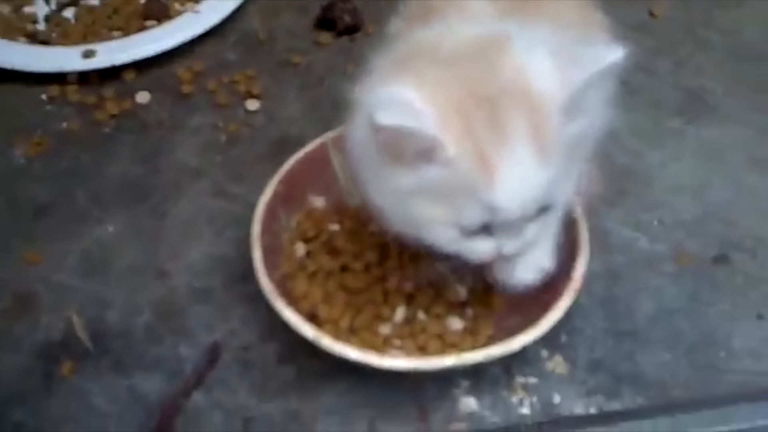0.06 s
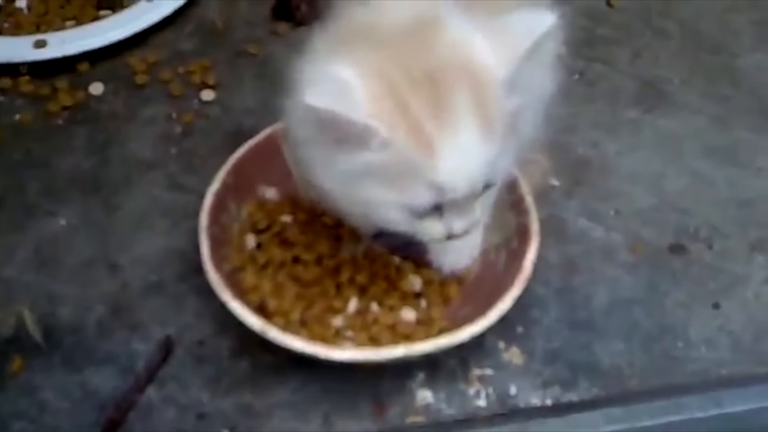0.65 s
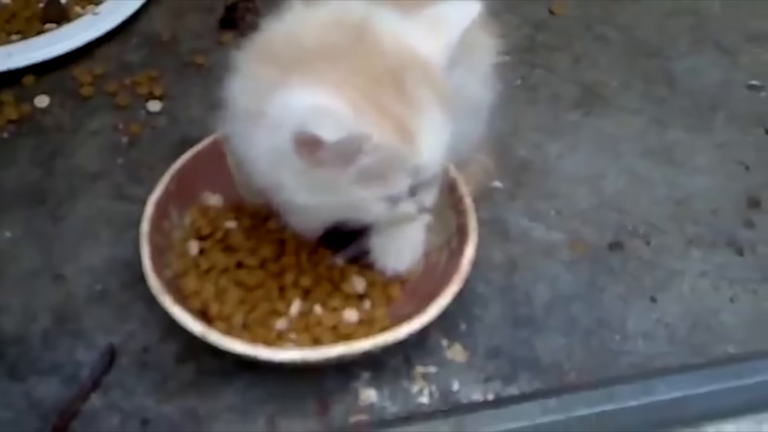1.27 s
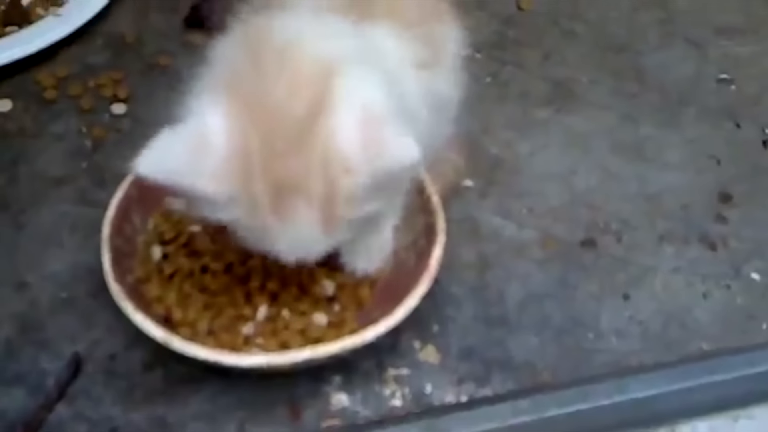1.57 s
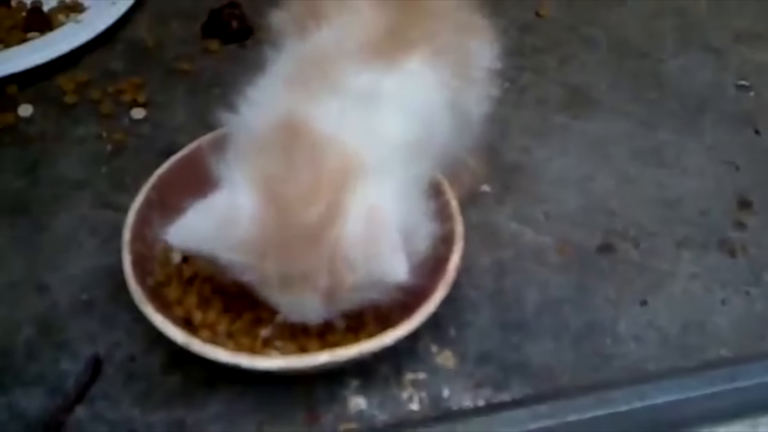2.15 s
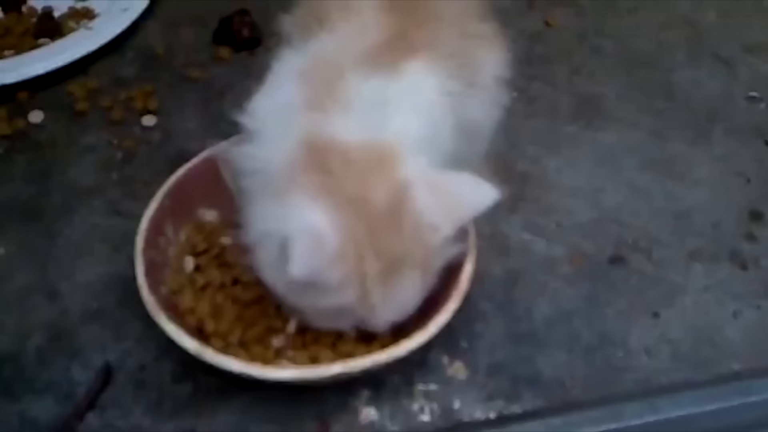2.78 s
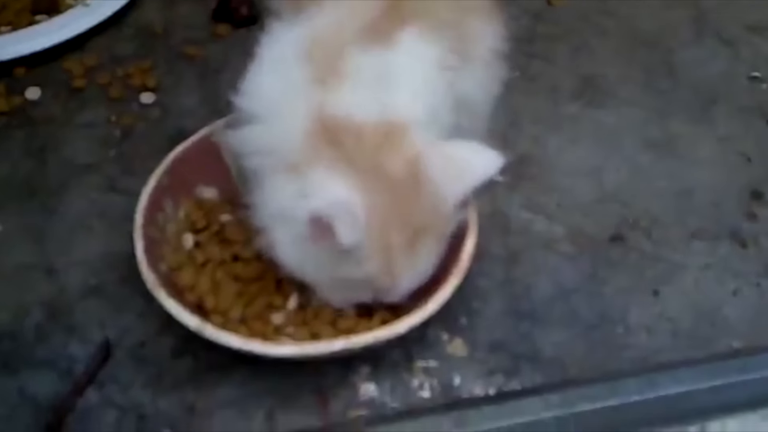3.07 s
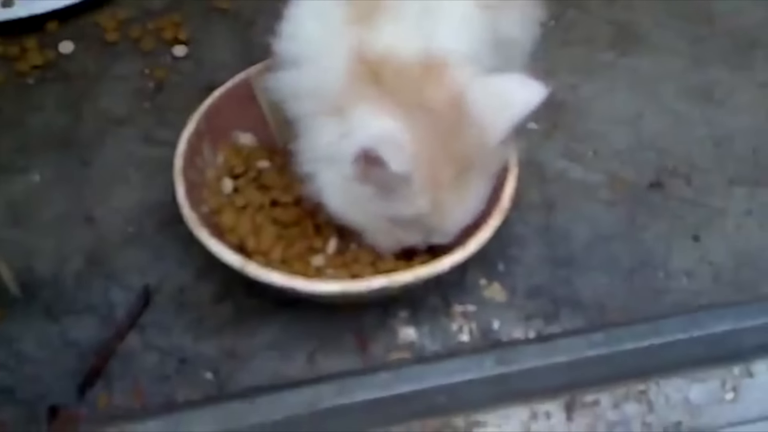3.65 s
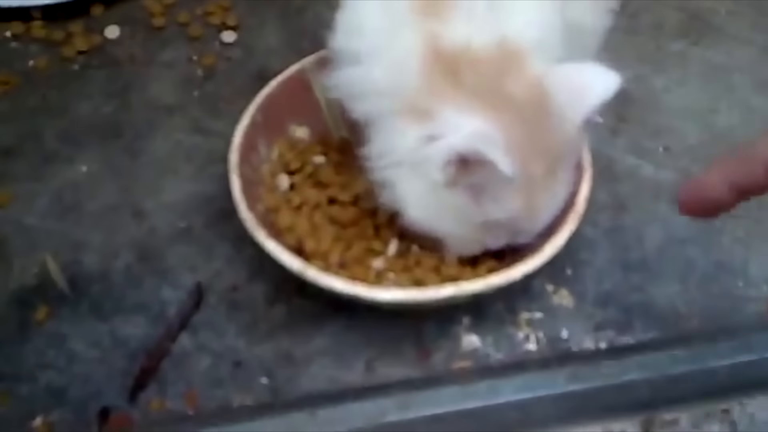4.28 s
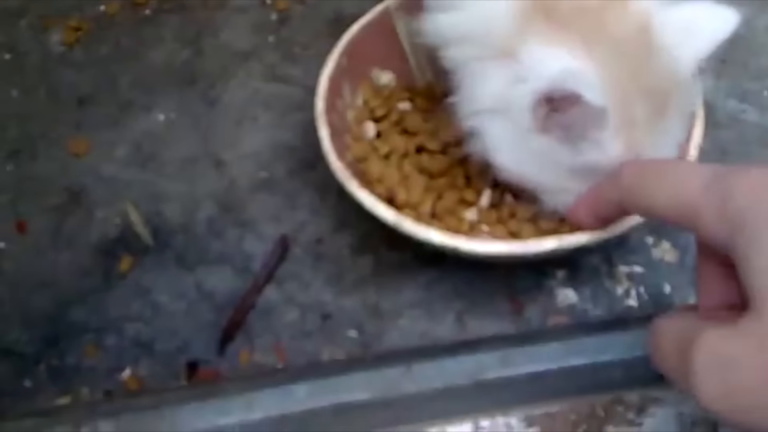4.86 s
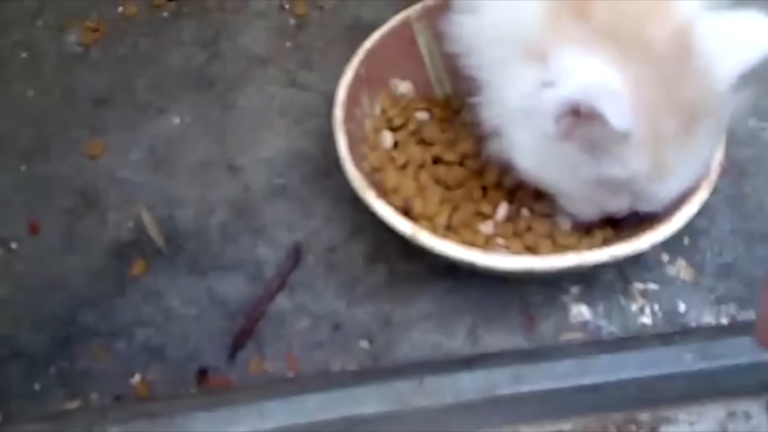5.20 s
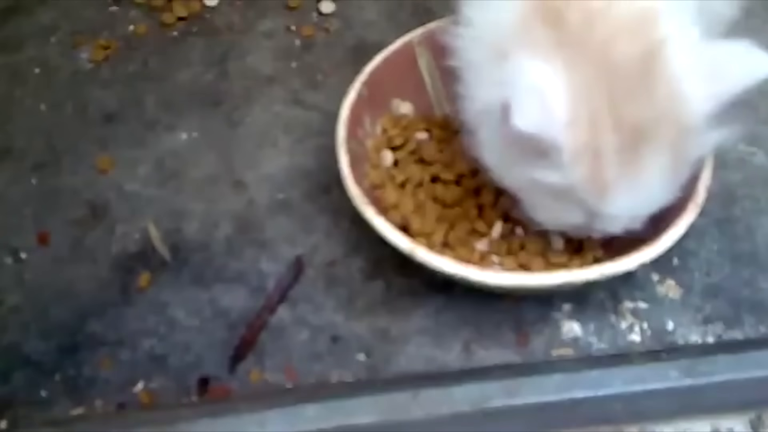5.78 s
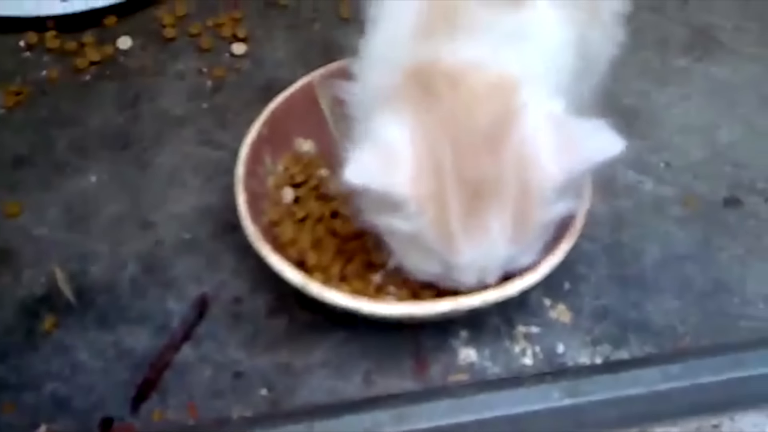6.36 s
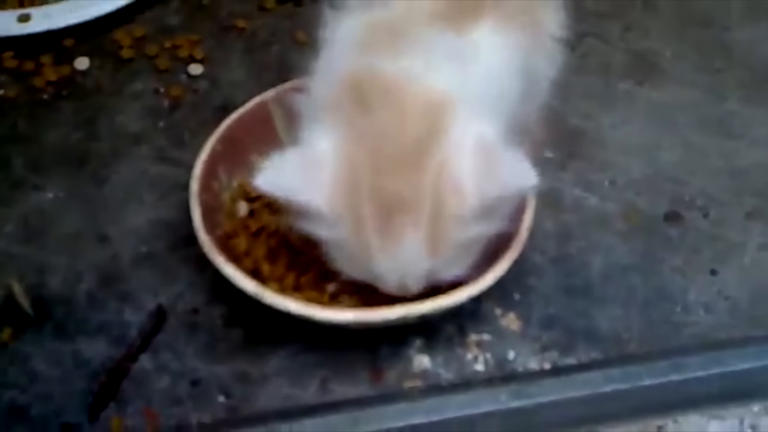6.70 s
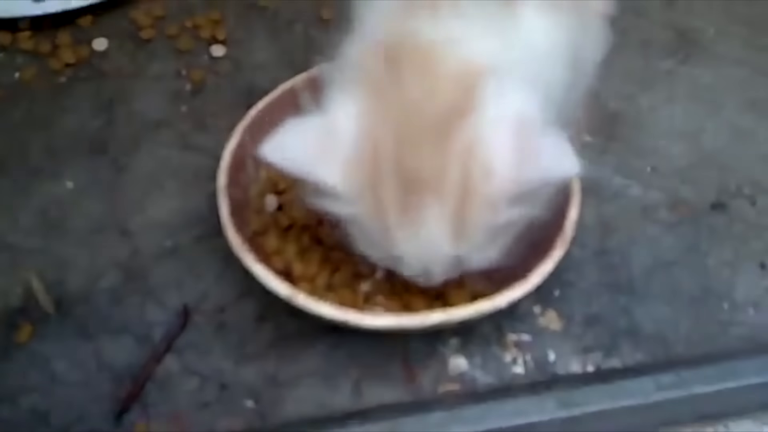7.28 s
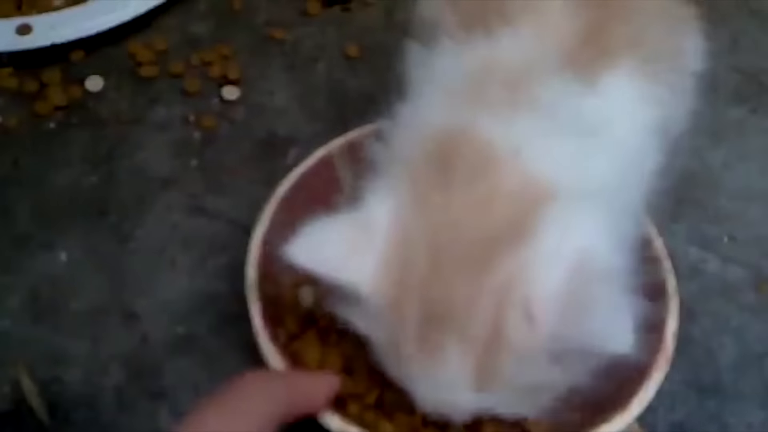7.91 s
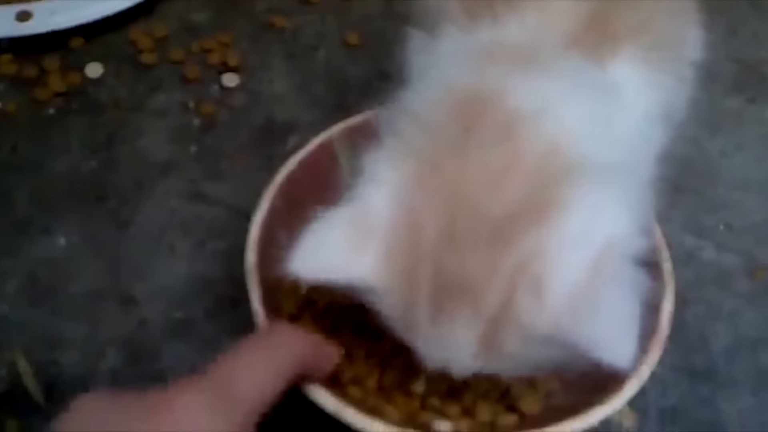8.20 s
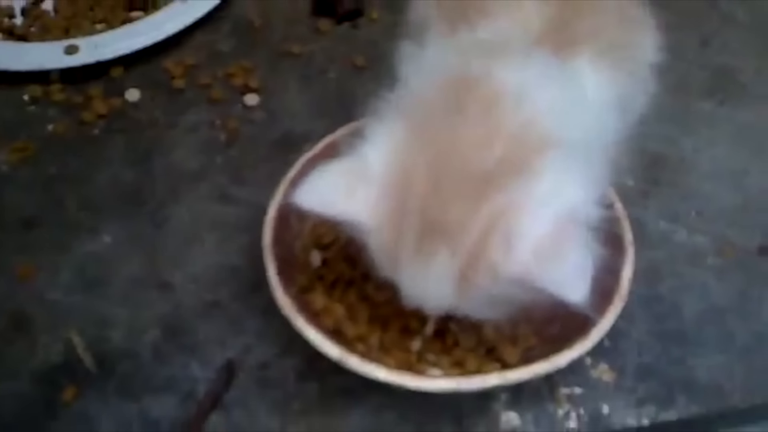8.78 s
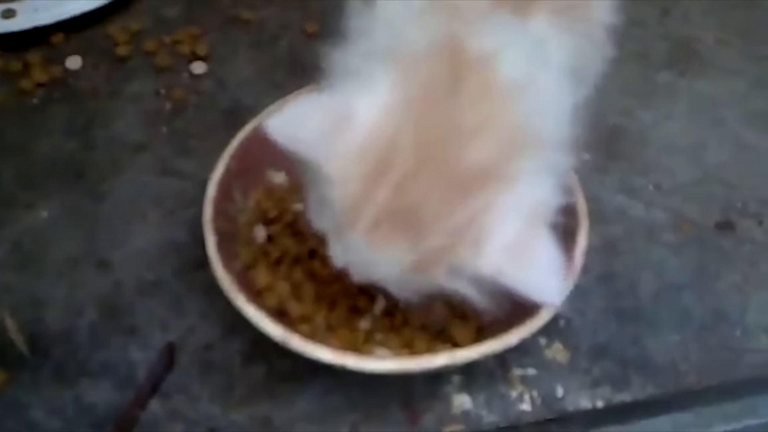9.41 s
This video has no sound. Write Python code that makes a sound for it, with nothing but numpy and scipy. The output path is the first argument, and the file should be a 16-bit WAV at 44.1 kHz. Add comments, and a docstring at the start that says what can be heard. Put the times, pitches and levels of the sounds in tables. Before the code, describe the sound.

A low, growling rumble runs throughout, like a car beyond a wall: it labours at first, revs up from about 2 to 5 seconds, drops for a gear change, then climbs again. Close to the microphone, in a room with little echo, a kitten eats dry food. Soft bumps, small ticks and a faint clink fill the first second. It spits at 1.3 seconds and more softly at 1.8, rustles the pellets around 3.2 and lightly knocks the bowl at 3.8. From 5.4 to 6.4 seconds it gives a high, raspy, wavering cry that arches and sinks, mixed with rustling food. Around 7 to 7.3 seconds comes a sharp cluster of kibble cracks and short bowl knocks, with small snorts. Very faint clinks follow. From 8.7 to 9.5 seconds the kitten cries again in hoarse, falling pieces, with one more crack and knock.

```python
"""On a concrete floor, a kitten guards a bowl of dry food. It spits, cracks kibble, knocks the bowl
and lets out wavering, raspy cries when a finger comes near. Its voice is a tone with overtones shaped
by the mouth, its spits are puffs of noise, and the food and bowl ring briefly when bitten or bumped.
Under it runs a low growling rumble, most likely a car beyond the wall that labours, revs up,
changes gear and pulls again."""
import sys
import numpy as np
from scipy import signal
from scipy.fft import rfft, irfft, next_fast_len
from scipy.io import wavfile

SR = 44100
rng = np.random.default_rng(int(sys.argv[2]) if len(sys.argv) > 2 else 0)


def dump_mix(stems):
    """Bounce the given channels to the path in sys.argv[1] as a 16-bit WAV at rate SR."""
    frames = np.atleast_2d(stems).T  # one column per channel
    limited = np.clip(frames, -1, 1)  # hard clip at full scale
    pcm = np.round(limited * 32767).astype(np.int16)
    wavfile.write(sys.argv[1], SR, pcm)


N = 416744
TIME = np.arange(N) / SR


def cries(air_db=-4, breath_db=-3, hum_db=-70, fade_s=.01, hoarse_loss=.85, shake=.4):
    """The vocal folds hum and the mouth lets overtones out; rasp splits the voice and adds hoarse air."""
    # the arching, sinking tunes, one list a cry: t/s, f/Hz
    tunes = [
        [(5.39, 1090), (5.478, 1110), (5.487, 960), (5.503, 1079), (5.527, 1171), (5.565, 1262), (5.63, 1188),
         (5.77, 1109), (5.877, 963), (5.94, 830)],
        [(5.97, 1220), (6.02, 1083), (6.12, 955), (6.17, 808), (6.45, 710)],
        [(8.715, 1047), (8.797, 1127), (8.805, 899), (8.822, 1042), (8.868, 1091), (8.9, 1066), (8.92, 982),
         (8.937, 988), (8.98, 951), (9.08, 804)],
        [(9.09, 795), (9.14, 719.6), (9.195, 758), (9.31, 668), (9.36, 605)],
        [(9.375, 743), (9.4, 716), (9.46, 663)],
    ]
    # the kitten pushes and the hum swells: peak t/s, rise/s, fall/s, level/dB
    pushes = [(5.868, 0.2, 0.039, -48), (6.03, 0.036, 0.066, -53.5), (6.11, 0.04, 0.017, -56.5),
              (8.87, 0.045, .06, -64), (8.972, 0.041, 0.022, -49), (9.12, .15, 0.3, -72)]
    # colour of the hoarse air: f/Hz, level/dB
    air_colour = [(600, 7), (1500, -3), (2000, 11), (2500, -3.5), (3100, -19), (4200, -10), (5300, -20),
                  (6300, -30.5), (8000, -31.5), (9800, -46), (12000, -34.5)]
    # colour of the thin, high breath: f/Hz, level/dB
    breath_colour = [(3000, -4), (4300, 2), (5400, 8), (6600, -11), (9500, -9), (11500, -12.5)]
    flutter, air, breath = drift(54), noise(air_colour), noise(breath_colour)
    k = np.arange(2, 16)[:, None]  # overtones, as multiples of the pitch
    flicker = from_db(1.7 * np.array([drift(30) for _ in k]))  # each wavers on its own
    hum = (from_db(hum_db) + bursts(pushes)) * from_db(2.5 * drift(35))
    shape, out = jaw(), np.zeros(N)
    for tune in tunes:
        start, end = tune[0][0] - fade_s, tune[-1][0] + fade_s
        on = (TIME > start) & (TIME < end)
        t = TIME[on]
        opening, dip, rasp, mouth_hz, upper_hz, upper_db, sheen_db = shape[:, on]
        rasp = np.clip(rasp, 0, 1)
        hz = in_time(tune)[on] * dip
        phase = vocal_fold(hz, rasp, slip_hz=47)
        # in a strong rasp one fold strays higher and takes up to half of the overtones' power
        stray = vocal_fold(hz * 1.13, rasp, slip_hz=31)
        split = np.interp(rasp, [.7, 1], [0, .5])
        waves = np.sqrt(1 - split) * np.sin(k * phase) + np.sqrt(split) * np.sin(k * stray)
        gains = mouth(k * hz, mouth_hz, upper_hz, upper_db, sheen_db)
        overtones = (gains * flicker[:, on] * waves).sum(axis=0)
        # the hum's octave is faint, except where the nose rings with it
        octave = from_db(-35) + from_db(14.5) * resonance(2 * hz, 1230, width_hz=110)
        tone = hum[on] * np.sqrt(2) * (np.sin(phase) + octave * np.sin(2 * phase)) + opening * overtones
        hiss = rasp ** 2.5 * from_db(air_db) * air[on] + from_db(breath_db + sheen_db) * breath[on]
        puffs = opening * hiss * (1 + np.cos(phase) / 2)  # air escapes once a cycle
        voice = np.sqrt(1 - hoarse_loss * rasp ** 2) * tone + puffs
        fade = np.minimum(np.minimum(t - t[0], end - t) / fade_s, 1)
        out[on] += voice * fade * (1 + shake * rasp ** 2 * flutter[on])
    return out


def vocal_fold(hz, rasp, slip_hz, slip=.12, waver=.007, jitter=.042):
    """Phase of a vocal fold: its pitch wavers, shakes with rasp, and in a snarl climbs and slips back."""
    slips = slip * rasp ** 4 * signal.sawtooth(2 * np.pi * slip_hz * TIME[:len(hz)])
    unrest = waver * drift(35)[:len(hz)] + jitter * rasp ** 2 * drift(320)[:len(hz)]
    return 2 * np.pi * np.cumsum(hz * (1 + slips + unrest)) / SR


def jaw(shut_db=-92.5, bite_s=.008, bite_dip=.07):
    """The jaw opens and chews: gives overtone level, pitch factor and the colour of the widest gape."""
    # the mouth opens: peak t/s, rise/s, fall/s, level/dB, rasp/0-1, mouth resonance/Hz,
    # upper resonance/Hz, upper resonance/dB, sheen and breath/dB
    gapes = [(5.465, 0.05, 0.029, -63, 1, 2230, 4500, -22, -29),
             (5.544, 0.046, 0.061, -46, 0.63, 2340, 4860, -36, -51),
             (8.804, 0.075, 0.037, -52.5, 0.92, 2220, 4960, -18.5, -29),
             (8.861, 0.034, 0.075, -44.5, 0.51, 2400, 5100, -31, -39.5),
             (8.954, 0.029, 0.029, -39.5, 0.51, 1940, 4920, -33.5, -53.5),
             (9.02, 0.036, 0.054, -69, 0.5, 1620, 5030, -36.5, -22),
             (9.2, 0.073, 0.07, -60.5, 0.66, 2500, 5400, -25.5, -31.5),
             (9.3, 0.022, 0.054, -63, 0.8, 2080, 5300, -25.5, -31),
             (9.445, 0.038, 0.072, -56, 0.7, 2595, 4030, -14, -33)]
    # each bite parts the lips and drags the pitch down: t/s, level/dB
    chews = [(5.581, -53.5), (5.673, -56.5), (5.741, -65)]
    widths = np.array([from_db(db) * swell(s, rise, fall) for s, rise, fall, db, *_ in gapes])
    widths += from_db(shut_db) / len(gapes)
    colour = np.transpose([row[4:] for row in gapes]) @ widths / widths.sum(axis=0)
    bites = [swell(s, bite_s, bite_s) for s, db in chews]
    opening = widths.sum(axis=0) + sum(from_db(db) * bite for (s, db), bite in zip(chews, bites))
    return np.array([opening, 1 - bite_dip * sum(bites), *colour])


def mouth(hz, mouth_hz, upper_hz, upper_db, sheen_db, leak_db=-52, upper_width_hz=750):
    """The mouth favours overtones near two resonances; higher ones die away, except for a thin sheen."""
    lower = resonance(hz, mouth_hz, width_hz=365)
    upper = from_db(upper_db) * resonance(hz, upper_hz, upper_width_hz)
    gains = (lower + upper + from_db(leak_db)) / (1 + (hz / (upper_hz + upper_width_hz)) ** 10)
    sheen = from_db(sheen_db) * resonance(hz, 9000, width_hz=2200)
    return gains / np.sqrt((gains ** 2).sum(axis=0) / 2) + sheen


def spits(sputter_db=2.5):
    """Short puffs of air swell, sputter and stop."""
    # spits and snorts: peak t/s, rise/s, fall/s, level/dB
    puffs = [(.35, 0.043, 0.035, -77), (1.286, 0.024, 0.02, -46.5), (1.725, 0.042, 0.05, -65),
             (1.786, 0.021, 0.02, -63), (3.16, 0.092, 0.067, -85), (3.775, 0.018, 0.012, -78),
             (6.808, 0.013, 0.021, -66.5), (6.9, 0.035, 0.04, -77.5), (7.118, 0.018, 0.028, -67),
             (8.69, 0.011, 0.013, -74.5)]
    # colour of a spit: f/Hz, level/dB
    colour = [(200, 8), (600, 6), (1200, -12), (2000, -1), (2800, 0), (3600, -6), (4600, -5), (5800, -18),
              (7200, -18), (9000, -27.5), (13000, -26)]
    return bursts(puffs) * from_db(sputter_db * drift(210)) * noise(colour)


def rooting(grain_db=2.5):
    """Pellets rub past each other in a dull, grainy rustle."""
    # the muzzle shoves through the food: peak t/s, rise/s, fall/s, level/dB, brightness/Hz
    shoves = [(0.188, 0.031, 0.026, -62, 2500), (2.12, 0.032, 0.035, -67, 2000),
              (3.18, 0.13, 0.18, -62, 610), (5.345, 0.023, 0.025, -54, 1190),
              (7.126, .03, .03, -54.5, 1200), (5.841, 0.048, .06, -60, 1500),
              (6.07, 0.25, .09, -59.5, 1510), (6.28, 0.022, .02, -58, 1109),
              (8.695, 0.012, 0.023, -60, 1280)]
    # colour of the rustle: f/Hz, level/dB
    colour = [(250, -10), (600, 9.5), (1000, 6.5), (1300, 9.5), (1700, 2), (2400, -20.5), (4000, -53)]
    grit = from_db(grain_db * drift(150)) * noise(colour)
    return sum(from_db(db) * swell(s, rise, fall) * lowpass(grit, hz) for s, rise, fall, db, hz in shoves)


def kibble(crumbs_db=-19, crumbs_s=.0009, ring_cycles=11, dull_above_hz=5600):
    """A pellet snaps, rings for a few cycles and sheds crumbs."""
    # pellets cracking and ticking: t/s, peak level/dB, f/Hz
    cracks = [(0.263, -45.5, 8660), (0.356, -57, 3100), (0.428, -70, 3000), (0.5832, -58, 4270),
              (0.615, -62, 8000), (2.048, -65.5, 6400), (6.9525, -39.5, 3200), (7.068, -57.5, 2967),
              (7.1052, -27, 2500), (7.1044, -32, 4400), (7.1054, -41.5, 5480), (7.1158, -51, 4500),
              (7.133, -48.5, 2980), (7.1363, -56, 5500), (7.1892, -29.5, 2400), (9.3278, -51.5, 3760)]
    out, t = np.zeros(N), TIME[:SR // 20]
    for s, db, hz in cracks:
        snap = (t == 0) + from_db(crumbs_db) * rng.standard_normal(len(t)) * np.exp(-t / crumbs_s)
        ringing = ring(snap, hz, ring_cycles / hz)
        crack = lowpass(np.diff(ringing, prepend=0), dull_above_hz)
        add(out, s, from_db(db) * crack / np.abs(crack).max())
    return out


def bowl(spread_db=.6):
    """Each knock rings the food-damped bowl a little differently, and shorter if the kitten leans on it."""
    # knocks: t/s, strength/dB, brightness/Hz, share of the free ring time/0-1
    knocks = [(1.283, -35, 400, 0.58), (1.778, -41, 440, 0.44), (3.786, -26, 251.6, 0.87),
              (7.07, -28.5, 450, 0.77), (7.1062, -20.5, 443, 0.74), (7.117, -30, 497, 0.83),
              (7.132, -12, 329.7, 0.55), (7.189, -18, 2016, 1), (9.331, -25, 665, 0.78)]
    # the bowl's own notes: f/Hz, level/dB, free ring time/s
    notes = [(247.2, -9.5, 0.06), (330, -6.5, 0.022), (606, -0.5, 0.026), (810, 0.5, 0.012),
             (1096, -1.5, 0.033), (1720, -6.5, 0.012), (2400, -7, 0.011), (2980, -17, 0.012),
             (3300, -21, 0.029)]
    out = np.zeros(N)
    for s, blow_db, contact_hz, free in knocks:
        blow = from_db(blow_db) * contact(contact_hz)
        for k, (hz, db, ring_s) in enumerate(notes):
            gain = (-1) ** k * from_db(db + spread_db * rng.standard_normal())  # neighbours swing opposite
            add(out, s, gain * ring(blow, hz, ring_s * free))
    return out


def contact(hz, bass_cut_share=.4):
    """The push of one blow: the harder the contact, the brighter it is and the less bass it has."""
    push = lowpass(1.0 * (TIME[:SR // 10] == 0), hz)
    return signal.lfilter(*signal.butter(1, bass_cut_share * hz, "high", fs=SR), push)


def bumps(waver=.13):
    """A padded contact gives a few low, uneven cycles."""
    # soft bumps of paws and jaw: peak t/s, rise/s, fall/s, level/dB, f/Hz
    thuds = [(0.173, 0.0048, 0.007, -38, 320), (0.36, 0.004, 0.0045, -39.5, 297),
             (.782, 0.01, 0.014, -40, 263), (3.155, .012, 0.036, -51.5, 368),
             (5.353, 0.013, 0.019, -41, 302), (6.889, 0.003, 0.0034, -41, 304.2),
             (6.92, 0.006, 0.01, -42.5, 260), (7.137, 0.0027, 0.005, -33.5, 268),
             (7.2015, 0.0097, 0.013, -33, 83), (7.341, 0.0051, 0.021, -40.5, 190),
             (8.69, 0.024, 0.024, -50.5, 307)]
    pace = np.cumsum(1 + waver * drift(96)) / SR
    return sum(from_db(db) * swell(s, rise, fall) * np.cos(2 * np.pi * hz * (pace - pace[int(s * SR)]))
               for s, rise, fall, db, hz in thuds)


def clink(rise_s=.008, scrape_s=.04, scrape_cycles=14):
    """A short scrape sets crockery ringing with thin, high notes."""
    # light clinks, one row a note: t/s, level/dB, f/Hz, ring time/s
    notes = [(.305, -70, 3900, 0.34), (.35, -71, 3100, 0.2), (.345, -67.5, 2200, 0.28),
             (7.865, -81, 2331, .18), (7.865, -82, 2900, 0.26), (7.87, -85, 4037, .28),
             (8.52, -84.5, 3321, .22), (8.505, -83.5, 6100, 0.26), (8.503, -83, 5000, .14),
             (8.497, -84, 7973, 0.22)]
    out, t = np.zeros(N), TIME[:SR // 2]
    for s, db, hz, ring_s in notes:
        scrape = rms_one(ring(rng.standard_normal(len(t)), hz, scrape_cycles / hz)) * np.exp(-t / scrape_s)
        tone = np.sin(2 * np.pi * hz * t) * from_db(-60 * t / ring_s)
        add(out, s, from_db(db) * (1 - np.exp(-t / rise_s)) * (tone + scrape))
    return out


def room(x, ring_s=.09, echo_db=-32, dull_above_hz=2000, delay_s=.004):
    """Nearby walls add a faint, dull echo."""
    t = TIME[:SR // 3]
    tail = lowpass(rng.standard_normal(len(t)), dull_above_hz) * from_db(-60 * t / ring_s) * (t > delay_s)
    return x + from_db(echo_db) * signal.fftconvolve(x, tail / np.linalg.norm(tail))[:N]


def car(wobble=.0024, recede_db_per_s=.59, coast_db=-10, coast_hz_per_s=65, rough=.25):
    """The engine's firings set the pitch of its tones and make the road noise throb, over a rumble."""
    # the engine labours, revs up, drops at the gear change and pulls again: t/s, firing rate/Hz
    revs = [(0, 42.3), (.25, 42.9), (.55, 41.22), (1.18, 37.74), (1.58, 32.87), (1.95, 43.05), (2.3, 47.7),
            (2.7, 57.16), (4.11, 91.5), (4.78, 103.8), (5.1, 103.8), (5.85, 67.28), (6.55, 71.17),
            (8.37, 89.72), (9.45, 101.7)]
    # the car swells: peak t/s, rise/s, fall/s, exhaust/dB, fan/dB, drone/dB, roar/dB, tyre hiss/dB
    surges = [(0.249, 0.35, 0.62, -40.5, -67.5, -46, -60.5, -67.5),
              (1.6, 0.67, 0.36, -53, -79.5, -83.5, -94, -91.5),
              (1.901, 0.093, 1.4, -61, -66.5, -67.5, -85, -84),
              (3.3, 0.33, 0.55, -67.5, -45.5, -70, -68.5, -110),
              (4.9, 0.78, 0.77, -53.5, -52, -52, -53.5, -72), (6.2, 0.56, 1.35, -51, -54, -62, -61, -72.5),
              (9.2, 0.42, 4.4, -79, -69.5, -53.5, -69, -77)]
    # colour of the rumble: f/Hz, level/dB
    rumble_colour = [(15, -26), (30, -12), (45, 3), (65, 2), (90, -1), (115, -17.5), (160, -21)]
    firing_hz = in_time(revs)
    phase = 2 * np.pi * np.cumsum(firing_hz * (1 + wobble * drift(8))) / SR
    pipe, whine, drone, roar, tyres = sum(from_db(dbs)[:, None] * swell(s, rise, fall)
                                          for s, rise, fall, *dbs in surges)
    nearness = from_db(-recede_db_per_s * TIME)  # the car draws away
    # some noise stays between the swells
    drone, roar, tyres = drone + from_db(-54), roar + from_db(-76), tyres + from_db(-86) * nearness ** 2
    # with the throttle shut the revs fall, and the firing tone and bray drop
    coasting = lowpass(np.clip(-np.gradient(firing_hz) * SR / coast_hz_per_s, 0, 1) ** 2, 23)
    throttle = from_db(coast_db * coasting)
    tones = exhaust(firing_hz, phase, pipe) + roar * throttle * bray(firing_hz, phase) + fan(phase, whine)
    rumble = from_db(-49.5) * nearness * noise(rumble_colour)
    road = road_noise(firing_hz, phase, drone, roar, tyres)
    shake = 1 + rough * drift(20)  # uneven firings
    return throttle * firing_tone(firing_hz, phase) + tones * shake + rumble + road


def firing_tone(firing_hz, phase):
    """The firings make a deep tone that booms or fades, most likely in the room's bass resonances."""
    # how the tone booms: firing rate/Hz, level/dB
    boom = [(33, -37.5), (42, -39), (55, -39.5), (61, -33), (66, -45.5), (74, -45.5), (82, -41.5),
            (89, -45), (93, -53), (105, -56)]
    # the engine strains once at low revs: peak t/s, rise/s, fall/s, level/dB
    lug = [(.24, 0.14, 0.18, -34.5)]
    return (gain_at(boom, firing_hz) + bursts(lug)) * np.sqrt(2) * np.sin(phase)


def exhaust(firing_hz, phase, surge, rest_db=-65, dull_db=-7, flutter_db=2):
    """Exhaust overtones come through the wall; off load, the higher ones are weaker."""
    # overtones, with half steps from unequal cylinders: multiple of the firing rate, level/dB
    overtones = [(1.5, -5.5), (2, 3), (3, -6), (3.5, -8.5), (4, -5)]
    # what the wall lets through: f/Hz, level/dB
    wall = [(40, -9), (85, 2), (130, -5.5), (170, -3.5), (205, 0), (300, -13.5), (420, 4.5), (600, -16)]
    level = surge + from_db(rest_db)
    idle = from_db(rest_db) / level
    out = np.zeros(N)
    for k, db in overtones:
        gain = from_db(db + dull_db * idle * max(k - 2, 0) + flutter_db * drift(2.7))
        out += gain * gain_at(wall, k * firing_hz) * np.sin(k * phase + rng.uniform(0, 2 * np.pi))
    return level * out


def bray(firing_hz, phase, from_hz=75, full_hz=100, flutter_db=2):
    """At top revs the exhaust brays with a row of overtones."""
    # the bray's overtones: multiple of the firing rate, level/dB
    overtones = [(2, 0), (3, -10), (5, -14), (6, -10), (7, -16), (8, -16), (9, -22), (12, -25), (13, -25)]
    tones = sum(from_db(db + flutter_db * drift(6)) * np.sin(k * phase + rng.uniform(0, 2 * np.pi))
                for k, db in overtones)
    return np.interp(firing_hz, [from_hz, full_hz], [0, 1]) * tones


def fan(phase, surge, rest_db=-61, pitch_ratio=2.56, flutter_db=2):
    """The belt turns the fan, so its tone follows the revs."""
    return (from_db(rest_db) + surge) * from_db(flutter_db * drift(7.9)) * np.sin(pitch_ratio * phase)


def road_noise(firing_hz, phase, drone, roar, tyres, unrest_db=1.4, throb=.45, throb_at_hz=40):
    """Three bands of uneven noise throb with the firings; faster firings run together and throb less."""
    # colours of the low drone, the middle roar and the tyre hiss: f/Hz, level/dB
    drone_colour = [(70, -28), (110, -0.5), (140, 3.5), (190, -2), (240, -14), (300, -24.5), (450, -34)]
    roar_colour = [(180, -18.5), (280, 7.5), (400, 0.5), (620, -5), (800, -9), (1100, -30), (2000, -41)]
    tyre_colour = [(500, -22.5), (900, -3.5), (1250, -3), (1700, -8), (2100, -12), (2700, -24.5),
                   (4500, -32.5), (10000, -38)]
    bands = sum(from_db(unrest_db * drift(8.4)) * level * noise(colour, hollow=True)
                for level, colour in [(drone, drone_colour), (roar, roar_colour), (tyres, tyre_colour)])
    return bands * (1 + throb * throb_at_hz / firing_hz * np.sin(phase))


def standing_waves(hz, width_share=.05, between_db=-2.2):
    """Standing waves boost some pitches, which makes the road noise sound hollow."""
    # the boosted pitches: f/Hz, boost/dB
    peaks = [(365, 5.5), (402, 7.5), (510, 4.5), (570, 3), (650, 6.5), (795, 2.5), (920, 6), (1115, 6),
             (1320, 5)]
    return from_db(between_db + sum(db * resonance(hz, peak, width_share * peak) for peak, db in peaks))


def still_air(level_db=-95.5):
    """A faint, steady hiss."""
    # colour of the hiss: f/Hz, level/dB
    colour = [(100, 7.5), (1000, 3), (3000, 2), (6000, 3), (11500, -2), (15000, -20)]
    return from_db(level_db) * noise(colour)


def noise(colour, hollow=False):
    """Noise of power 1 in this colour, falling away past its ends; hollow adds the standing waves."""
    size = next_fast_len(N)
    hz = np.arange(size // 2 + 1) * SR / size
    ends = np.minimum(hz / colour[0][0], 1) ** 2 / np.maximum(hz / colour[-1][0], 1) ** 4
    gains = gain_at(colour, hz) * ends
    if hollow:
        gains *= standing_waves(hz)
    return rms_one(irfft(rfft(rng.standard_normal(size)) * gains, size)[:N])


def swell(s, rise, fall):
    """A smooth rise to 1 at time s, then a smooth fall."""
    out, near = np.zeros(N), slice(*np.searchsorted(TIME, [s - 4 * rise, s + 4 * fall]))
    t = TIME[near] - s
    out[near] = np.exp(-(t / np.where(t < 0, rise, fall)) ** 2)
    return out


def bursts(rows):
    """Loudness of several short swells."""
    return sum(from_db(db) * swell(s, rise, fall) for s, rise, fall, db in rows)


def ring(clicks, hz, ring_s):
    """Each click starts a tone that fades by 60 dB in the ring time."""
    decay, step = from_db(-60 / (ring_s * SR)), 2 * np.pi * hz / SR
    return signal.lfilter([0, np.sin(step)], [1, -2 * decay * np.cos(step), decay ** 2], clicks + 1e-18)


def resonance(hz, centre_hz, width_hz):
    """A peak of gain, 1 at its centre."""
    return 1 / (1 + (2 * (hz - centre_hz) / width_hz) ** 2)


def drift(rate_hz):
    """A random wander of typical size 1."""
    return rms_one(lowpass(rng.standard_normal(N + SR), rate_hz)[SR:])


def lowpass(x, hz):
    """Dull the sound above this frequency."""
    return signal.sosfilt(signal.butter(2, min(hz, SR / 3), fs=SR, output="sos"), x + 1e-18)


def gain_at(colour, hz):
    """A colour's gain at these frequencies."""
    points_hz, db = np.transpose(colour)
    return from_db(np.interp(np.log(np.maximum(hz, 1)), np.log(points_hz), db))


def in_time(points):
    """Join (time, value) points with straight lines."""
    return np.interp(TIME, *np.transpose(points))


def add(out, s, sound):
    """Mix a short sound in at its time."""
    at = int(s * SR)
    out[at:at + len(sound)] += sound[:N - at]


def from_db(db):
    """Decibels to gain."""
    return 10 ** (np.asarray(db) / 20)


def rms_one(x):
    """Scale to an average power of 1."""
    return x / np.sqrt(np.mean(x ** 2) + 1e-20)


def scene():
    """The kitten and its bowl close by, the car far off, a faint hiss behind."""
    kitten = room(cries() + spits() + rooting() + kibble() + bowl() + bumps() + clink())
    return (kitten + car() + still_air())[None]


def record(dry, cutoff_hz=12200):
    """The highest treble is cut off steeply."""
    return signal.sosfilt(signal.butter(12, cutoff_hz, fs=SR, output="sos"), dry)


dry = scene()
out = record(dry)
dump_mix(out)
```